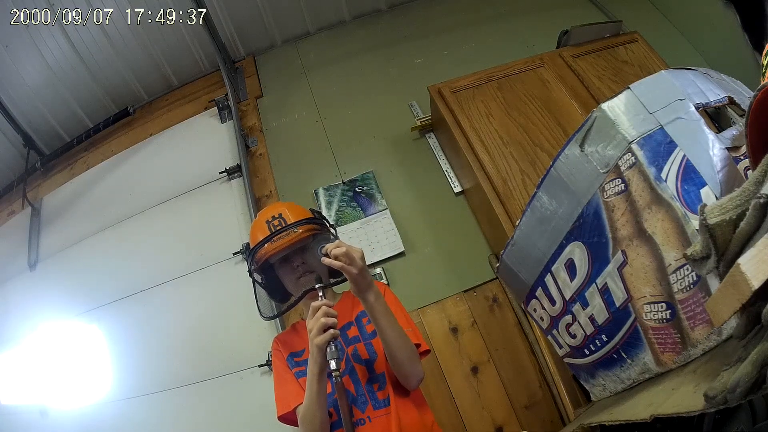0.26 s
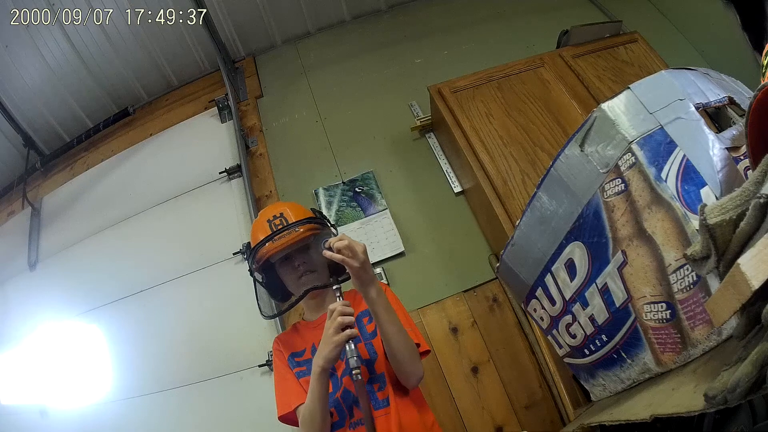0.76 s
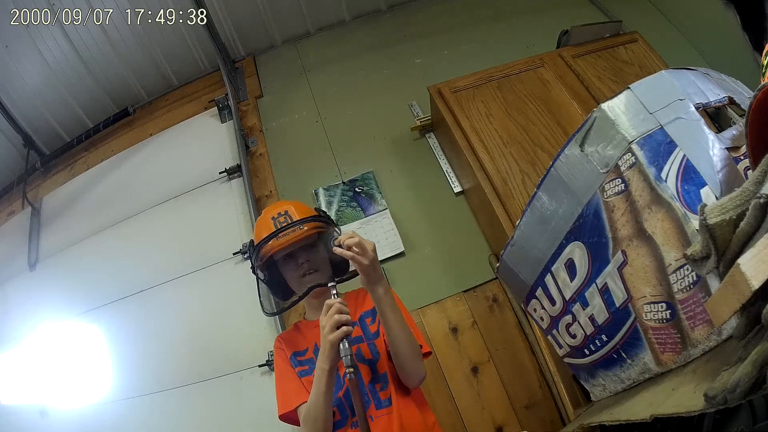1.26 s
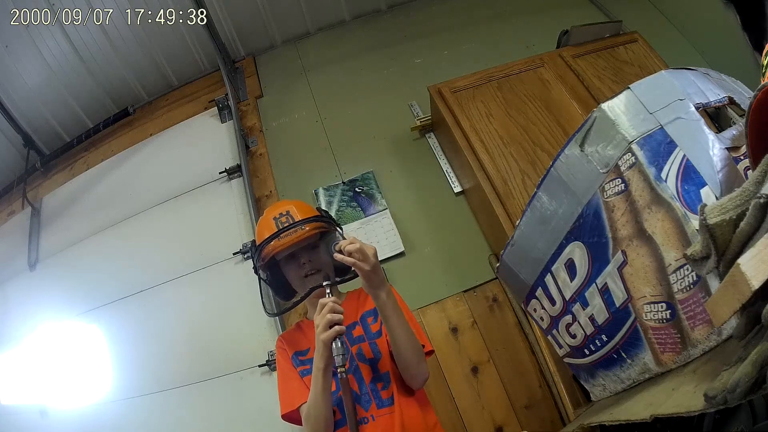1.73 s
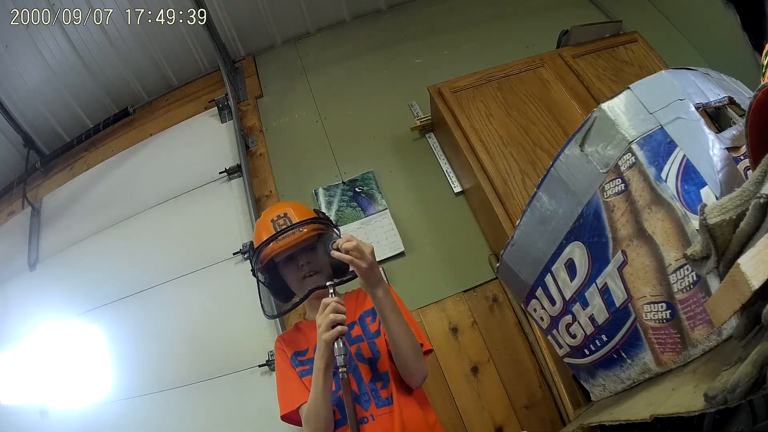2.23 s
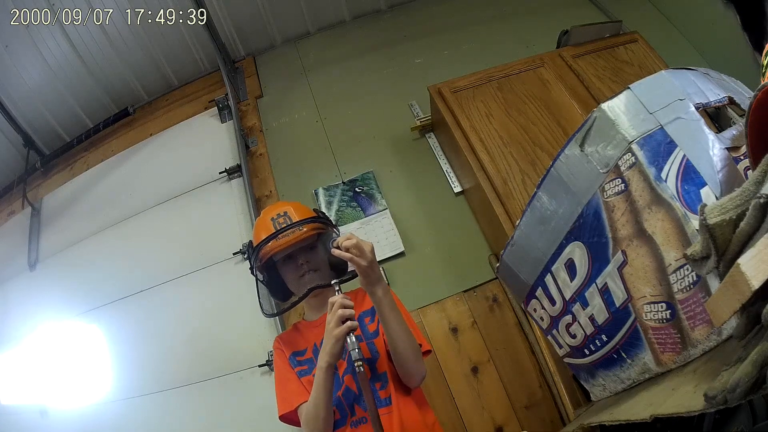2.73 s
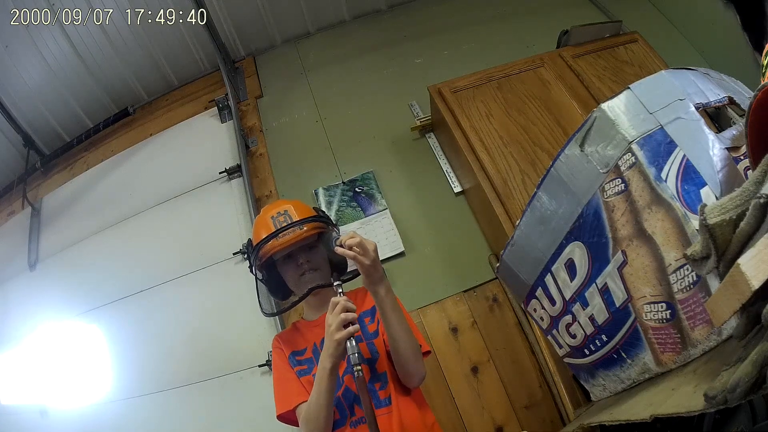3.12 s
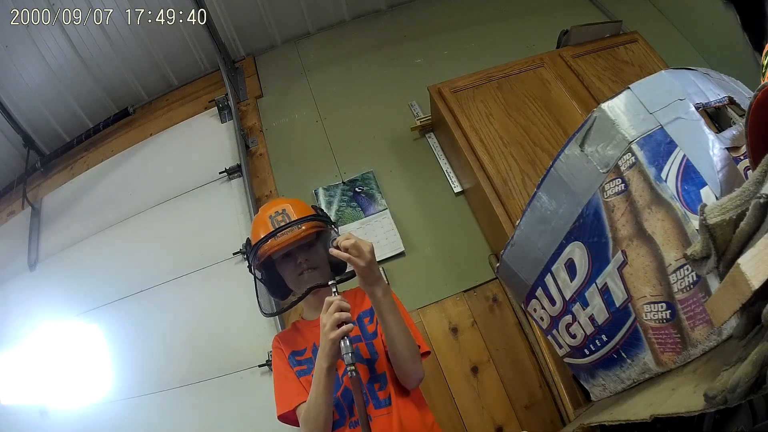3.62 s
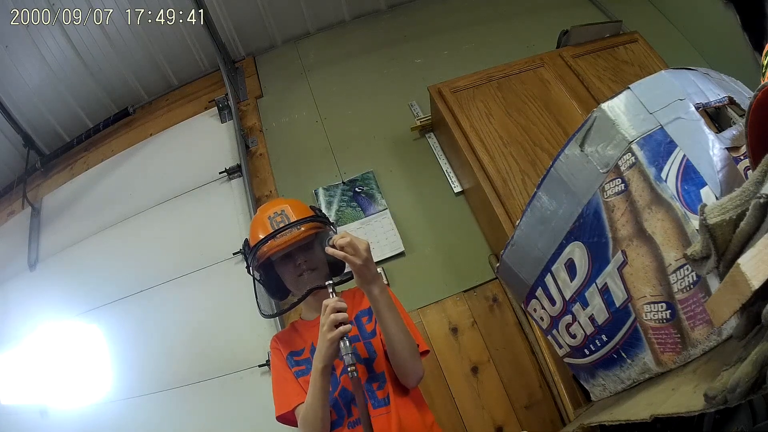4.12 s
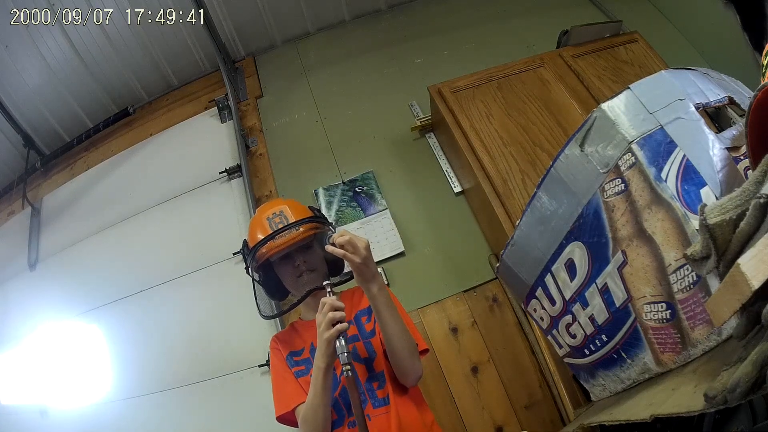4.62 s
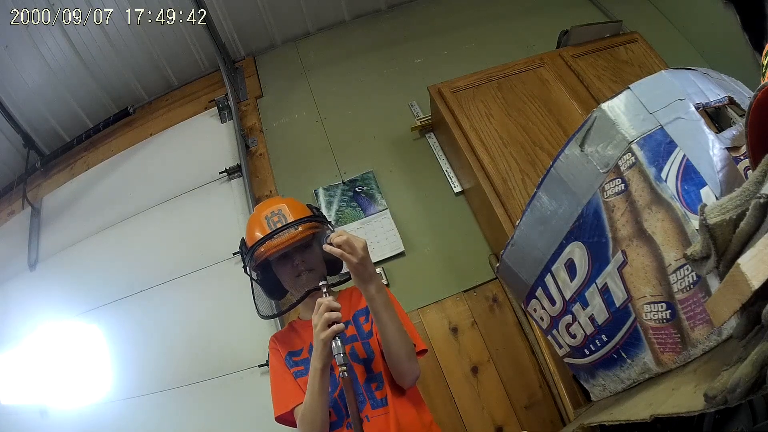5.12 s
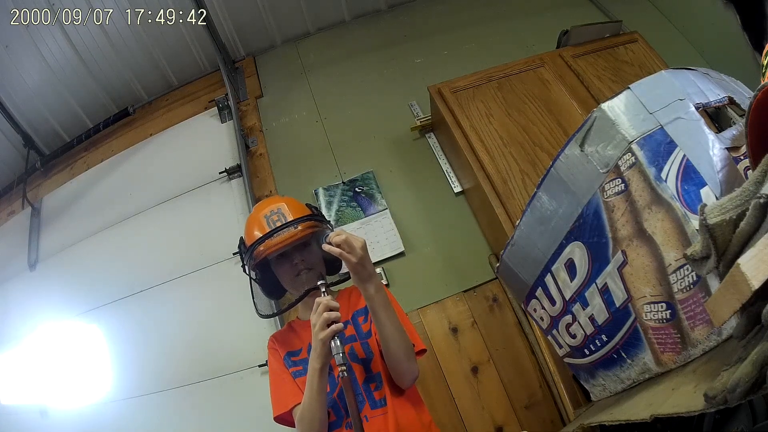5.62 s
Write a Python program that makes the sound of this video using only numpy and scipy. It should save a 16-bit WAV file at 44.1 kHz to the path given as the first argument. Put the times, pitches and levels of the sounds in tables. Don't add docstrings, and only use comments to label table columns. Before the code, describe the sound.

A blow gun in a lively workshop, a couple of metres from a small microphone. Bright, harsh air hiss is already running, stops, then returns in three more squeezes. Inside it a small two-lobed spinner buzzes with a nasal low whine, fluttering the hiss. In the gaps the air cuts off, the room rings on and the toy coasts with a faint whirr and ticks.

```python
import sys
import numpy as np
from scipy import signal
from scipy.fft import rfft, irfft, next_fast_len
from scipy.io import wavfile
from scipy.ndimage import uniform_filter1d

SR = 44100
rng = np.random.default_rng(int(sys.argv[2]) if len(sys.argv) > 2 else 0)


def materialize(psi):
    bounded = np.clip(np.atleast_2d(psi).T, -1, 1)
    quanta = np.round(bounded * 32767).astype(np.int16)
    wavfile.write(sys.argv[1], SR, quanta)


def field_ratio(decibels):
    return 10 ** (np.asarray(decibels, dtype=float) / 20)


N = 258867
T = np.arange(N) / SR
M = next_fast_len(N)
FREQS = np.arange(M // 2 + 1) * SR / M

# t/s, hiss level/dB
AIR_BURSTS = [
    [(0.0, -19), (0.202, -19.5), (0.546, -17.5), (0.556, -23.5)],
    [(1.018, -12), (1.078, -16), (1.19, -21), (1.358, -25), (1.492, -17), (1.62, -20), (1.898, -18.5),
     (2.324, -17.5), (2.462, -24.5)],
    [(2.85, -22), (2.86, -15.5), (3.022, -17), (3.192, -23), (3.284, -17.5), (3.388, -20.5), (3.578, -18),
     (3.694, -21.5), (4.068, -19.5)],
    [(4.47, -22), (4.476, -19), (4.566, -20.5), (4.652, -22), (5.0, -20.5), (5.78, -20.5), (5.87, -21.5)],
]
# multiple of the lobe rate, level in the jet/dB, level while coasting/dB
LEADING_PARTIALS = [(1, 0, -7.5), (2, 1, -2.5), (3, 0.5, -4), (5, 1.5, -10), (1.5, -10, -5.5),
                    (2.5, -12.5, -12), (3.5, -7, -11), (4, -1.5, -3)]


def noise():
    return rng.standard_normal(N)


def walk(rate):
    hold = int(SR / rate)
    stairs = np.repeat(rng.standard_normal(N // hold + 1), hold)
    return 1.3 * uniform_filter1d(uniform_filter1d(stairs, hold), hold)[:N]


def colour(x, points, lo_hz=1., hi_hz=30000.):
    f = FREQS + 1e-3
    hz, db = np.transpose(points)
    edge = 1 / np.sqrt((1 + (lo_hz / f) ** 6) * (1 + (f / hi_hz) ** 6))
    gain = field_ratio(np.interp(np.log(f), np.log(hz), db)) * edge
    y = irfft(rfft(x, M) * gain, M)[:N]
    return y / np.std(y)


def with_peaks(points, peaks):
    f = np.geomspace(15, 16000, 1500)
    hz, db = np.transpose(points)
    bumps = sum(gain_db / (1 + (2 * (f - centre) / width) ** 2) for centre, width, gain_db in peaks)
    return np.transpose([f, np.interp(np.log(f), np.log(hz), db) + bumps])


def burst_index():
    return np.searchsorted([burst[0][0] - .1 for burst in AIR_BURSTS[1:]], T)


def lobe_puff(turns, lag, sharp):
    passing = turns - lag
    bump = np.exp(sharp * np.cos(2 * np.pi * passing)) * (1 + 0.18 * np.cos(np.pi * passing))
    return bump / bump.mean()


def room(x):
    # f/Hz, time to fall 60 dB/s
    decay_times = [(200, 0.93), (1500, 0.86), (5000, 0.74), (10000, 0.65), (13500, 0.78), (16000, 0.33)]
    # t/s, level/dB
    reflections = [
        (.0021, -27),
        (.0047, -16),
        (.0079, -16),
        (0.011, -10.5),
    ]
    hz, t60 = np.transpose(decay_times)
    sound = rfft(x, M)
    fresh = rfft(noise(), M) * uniform_filter1d(np.abs(sound), 800)
    tail = np.zeros(N)
    for centre in 250 * 2 ** np.arange(0, 6.1, .5):
        shape = np.cos(np.pi * np.clip(np.log2(FREQS / centre + 1e-9), -.5, .5))
        keep = field_ratio(-120 / SR / np.interp(np.log(centre), np.log(hz), t60))
        power = irfft(sound * shape, M)[:N] ** 2
        held = signal.lfilter([1 - keep], [1, -keep], power, zi=[power[:4000].mean()])[0]
        held = uniform_filter1d(held, 600, origin=299)
        echoes = irfft(fresh * shape, M)[:N]
        tail += np.sqrt(np.abs(held)) * echoes / np.std(echoes)
    early = sum(field_ratio(db) * np.roll(x, int(s * SR)) for s, db in reflections)
    return field_ratio(-5) * tail + early


def thumps():
    # t/s, peak level/dB, length/s
    gusts = [(1.018, -40, .008), (1.036, -37, .008), (1.07, -31, .01), (1.108, -33, 0.0082),
             (1.498, -42, 0.023), (2.35, -50, 0.017), (2.855, -45, .012), (2.92, -40, .015),
             (2.97, -45, .02), (3.255, -42, .01), (4.467, -41, 0.013)]
    spiky = noise() * field_ratio(2.4 * walk(400))
    rumble = colour(spiky, [(20, 0), (150, -6), (600, -2), (1000, -4)], 60., 900.)
    envelope = 0
    for s, db, length in gusts:
        t = np.maximum(T - s, 0) / max(length, .003)
        envelope = envelope + field_ratio(db - 8) * t * np.exp(1 - t * t)
    return envelope * rumble


def coast(turns, fast):
    # f/Hz, level/dB per Hz
    whirr_colour = [(18, -43), (30, -6.5), (75, -9), (213, -9), (292, -9.5), (332, -12), (399, -11),
                    (455, -7.5), (518, -8), (691, -12.5), (852, -12.5), (3320, -23), (13300, 1),
                    (15500, -7.5)]
    # f/Hz, width/Hz, level/dB
    bearing_ring = [(13500, 900, 29)]
    whirr_db, ring_db = -43 + 11.5 * fast, -57 + 30 * fast
    ticks = (rng.random(N) < 40 / SR) * field_ratio(2.6 * rng.standard_normal(N))
    ticks = np.convolve(ticks, np.exp(-np.arange(300) / 45.0))[:N]
    chopped = np.sqrt(0.82 + 0.3 * lobe_puff(turns, lag=0.47, sharp=1.42))
    rolling = noise() * (chopped + 1.5 * ticks)
    ring = colour(rolling, with_peaks([(100, 0), (16000, 0)], bearing_ring), 9000.)
    return field_ratio(whirr_db) * colour(rolling, whirr_colour) + field_ratio(ring_db) * ring


def partial_levels(fast):
    # t/s, length/s, whine level/dB, lowest partial level over it/dB, brightest multiple
    catches = [(-.05, 0.33, -46.5, -20, 3.2), (0.243, 0.35, -46, -6.5, 3.2), (1.088, .2, -48.5, -2.5, 2.8),
               (1.533, 0.46, -53, -13.5, 3.2), (1.97, .2, -49, -13.5, 3.4), (2.14, 0.24, -48, -2.5, 3.6),
               (2.923, 0.23, -49.5, -14, 3), (3.256, 0.21, -53.5, -9, 3), (3.42, 0.357, -50, -17, 4.2),
               (3.762, 0.29, -52, -26, 2.4), (4.468, 0.21, -57, 2, 3.6), (4.7, .5, -57.5, 0, 4.2),
               (5.18, 0.66, -58.5, -1, 4.2)]
    # t/s, span/s, multiple, level/dB
    swells = [(0.25, .2, 3, 6), (0.8, 0.048, 2, 9), (1.73, 0.18, 2, 4.5), (1.76, .15, 5, 4),
              (1.75, 0.18, 3, -4), (1.92, .07, 2.5, 14), (2.04, 0.06, 3, 5.5), (2.14, 0.15, 4, -10),
              (2.33, 0.04, 4, 2), (2.22, 0.059, 5, 5.5), (3.04, 0.16, 5, -10), (3.7, 0.11, 3.5, 3.5),
              (3.8, .12, 2.5, 8), (3.47, 0.21, 1.5, 7), (4.6, 0.1, 5, -6), (5.5, 0.45, 3, -8),
              (5.81, .4, 4, -4), (5.75, 0.19, 2, 4), (5.09, .6, 1.5, 10.5), (0.087, 0.089, 2, 1.5),
              (1.33, .08, 1, 1), (2.95, 0.046, 4, 7), (2.98, .12, 2.5, 7), (3.7, .1, 5, -5),
              (4.83, 0.27, 5, 4.5), (5.3, .5, 2.5, -8), (5, .3, 2, -5), (5.4, 0.26, 3.5, 1.5),
              (2.4, .1, 2, -3)]
    lopsided = [-2, 1.3, 1, 5]
    catch_edge_s, bright_db_per_oct2 = 0.074, 8.5
    lopsided_db = np.array(lopsided)[burst_index()]
    out = []
    for k, jet_db, coast_db in LEADING_PARTIALS:
        power = field_ratio(-64 + coast_db + 32 * fast) ** 2
        for s, length, db, low_db, bright in catches:
            on = np.clip(np.minimum(T - s, s + length - T) / catch_edge_s + .5, 0, 1)
            tone_db = low_db if k == 1 else jet_db - bright_db_per_oct2 * np.log2(k / bright) ** 2
            power = power + (on * field_ratio(db + tone_db)) ** 2
        swell_db = sum(db * np.exp(-((T - s) / span) ** 2)
                       for s, span, multiple, db in swells if round(2 * multiple) == round(2 * k))
        is_half = round(2 * k) % 2
        out.append(10 * np.log10(power) + swell_db + lopsided_db * is_half)
    return out


def whine(turns, lead_db, gate):
    # multiple, leader 0-7, level over it/dB
    follower_partials = [(.5, 4, -15), (4.5, 6, -2), (5.5, 6, -2), (6, 3, -11), (6.5, 6, -2), (7, 7, -4),
                         (8, 3, -4)]
    leaders = [(row[0], i, 0) for i, row in enumerate(LEADING_PARTIALS)]
    out = np.zeros(N)
    for k, leader, db in leaders + list(follower_partials):
        if db:
            wander_db = 2.0 * walk(4.5) - 9 * (1 - gate)
        else:
            wander_db = 1.0 * walk(24.86) - 0.7 * k * (1 - gate)
        slip = .5 * walk(8)
        out -= field_ratio(lead_db[leader] + db + wander_db) * np.sqrt(2) * np.cos(2 * np.pi * k * turns + slip)
    return out


def valve():
    # creep/s, creep level/dB, opening/s, shutting/s
    trigger_pulls = [
        (.004, -22, .002, 0.012),
        (.003, -24, 0.0041, 0.006),
        (0.0059, -16, 0.0089, 0.0031),
        (0.0054, -9, .002, .01),
    ]
    gate = 0
    for burst, (creep_s, creep_db, open_s, close_s) in zip(AIR_BURSTS, trigger_pulls):
        since = T - burst[0][0]
        creep = field_ratio(creep_db) * np.exp(np.minimum(since, 0) / creep_s)
        opening = np.maximum(np.clip(since / open_s + 1, 0, 1), creep)
        gate = gate + opening * np.clip((burst[-1][0] - T) / close_s + 2, 0, 1)
    return gate


def seat_squeak():
    # f/Hz, width/Hz, level/dB
    seat_peak = [(7500, 350, 32)]
    # level/dB, rise/s
    squeaks = [
        (-34, 0.0071),
        (-33, 0.012),
        (-47, 0.013),
    ]
    seat = colour(noise(), with_peaks([(100, 0), (16000, 0)], seat_peak))
    envelope = 0
    for burst, (db, rise_s) in zip(AIR_BURSTS[1:], squeaks):
        since = T - burst[0][0]
        envelope = envelope + field_ratio(db) * (since < 0) * np.exp(np.minimum(since, 0) / rise_s)
    return envelope * seat


def chop_depth():
    burst_chop = [0.28, .4, 0.59, 0.42]
    # t/s, more chop 0-1, span/s
    bites = [
        (1.035, .4, .03),
        (1.26, .2, .05),
        (1.52, .45, .045),
        (2.87, .35, .03),
        (2.94, .25, .04),
        (4.485, .35, .025),
    ]
    chop = np.array(burst_chop)[burst_index()]
    chop = chop + sum(more * np.exp(-((T - s) / span) ** 2) for s, more, span in bites)
    return np.clip(chop, 0, 1)


def jet(turns, gate):
    # f/Hz, level/dB per Hz
    hiss_colour = [(530, -53), (900, -49), (944, -42), (1030, -34), (1160, -24), (1710, -20), (2890, -12.5),
                   (4040, -10), (4280, -8.5), (4600, -10.5), (7060, -3), (8650, -4), (11200, -1),
                   (13800, -3), (15500, -16)]
    # f/Hz, width/Hz, level/dB
    nozzle_peaks = [(2510, 310, 0.5), (4120, 83, -2), (7100, 460, 1), (7340, 160, 2), (11400, 560, 2)]
    # f/Hz, level/dB per Hz
    buffet_colour = [(25, -11), (60, -4), (150, -13), (300, -3), (600, 5.5), (1200, 12.5), (2000, -21)]
    top_tilt = [0.28, 0.18, -0.46, .6]
    s, db = np.concatenate(AIR_BURSTS).T
    hiss_db = np.interp(T, s, db)
    over = hiss_db + 19
    splash_db = -12 - 0.16 * over
    top_db = 1.36 - 0.1 * over + np.array(top_tilt)[burst_index()]
    jet_colour = with_peaks(hiss_colour, nozzle_peaks)
    chop = chop_depth()
    shared_db = 0.53 * walk(40) + 0.59 * walk(300)
    out = field_ratio(-67.5 + 15.5 + 2.0 * walk(24.56)) * colour(noise(), buffet_colour)
    for lo_hz, hi_hz, db, share, sharp, spit_db in [(930.0, 4620.0, splash_db + 0.28, 3.06, 1.2, 2.0),
                                                    (4740.0, 8650.0, -0.23, 2.38, 1.32, 1.7),
                                                    (9700.0, 21000.0, top_db - .3, 0.57, 1.6, 1.14)]:
        depth = np.clip(chop * share, 0, 1)
        power = 1 - depth + depth * lobe_puff(turns, lag=0, sharp=sharp)
        flicker = field_ratio(shared_db + spit_db * walk(500) + 0.47 * walk(13))
        region = colour(noise() * np.sqrt(power) * flicker, jet_colour, lo_hz, hi_hz)
        out += field_ratio(hiss_db + db) * region
    return gate * out


def scene():
    # t/s, lobe passing f/Hz
    spin_speed = [(0.0, 252.4), (0.2, 257.3), (0.58, 264.6), (1.05, 214), (1.14, 218.4), (1.32, 223),
                  (1.52, 201.2), (1.62, 203.5), (1.9, 205.5), (2.38, 226.9), (2.9, 184.2), (3.12, 190),
                  (3.28, 186.1), (4.05, 208), (4.47, 174.4), (4.75, 179.5), (5.5, 172.8), (5.87, 168)]
    hz = np.interp(T, *np.transpose(spin_speed))
    turns = np.cumsum(hz * (1 + 0.0016 * walk(60))) / SR
    fast = np.log2(hz / 215)
    gate = valve()
    air = field_ratio(-0.66) * (jet(turns, gate) + seat_squeak())
    toy = coast(turns, fast) + whine(turns, partial_levels(fast), gate)
    return (room(air) + thumps() + toy + air)[None]


def roll_off(x):
    return signal.sosfilt(signal.butter(12, 15960, fs=SR, output="sos"), x)


def record(dry):
    ceiling, top_hz = .62, 15720
    rounded = dry / np.cbrt(np.sqrt(1 + (dry / ceiling) ** 6))
    passes = np.clip((top_hz - FREQS) / 60 + .5, 0, 1)
    cut = irfft(rfft(rounded, M) * passes, M)[:, :N]
    return roll_off(cut)


dry = scene()
out = record(dry)
materialize(out)
```